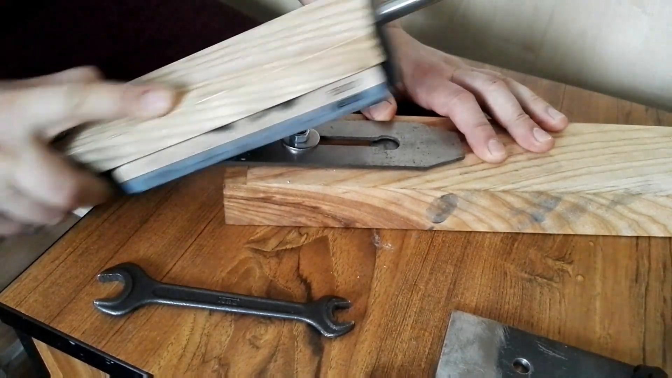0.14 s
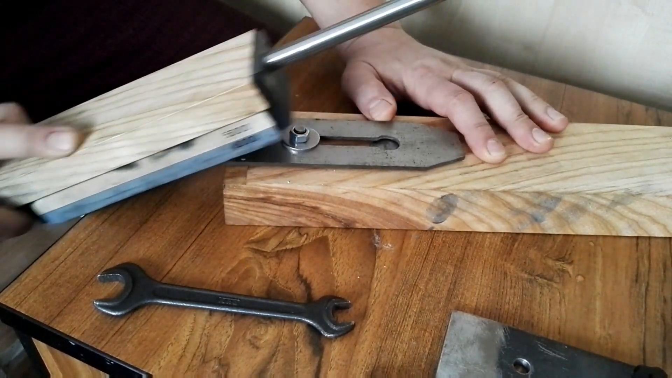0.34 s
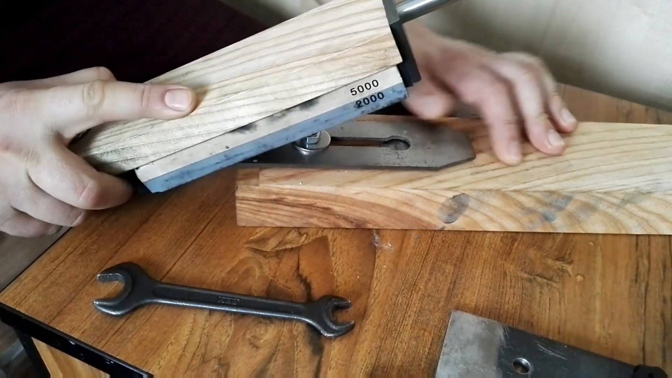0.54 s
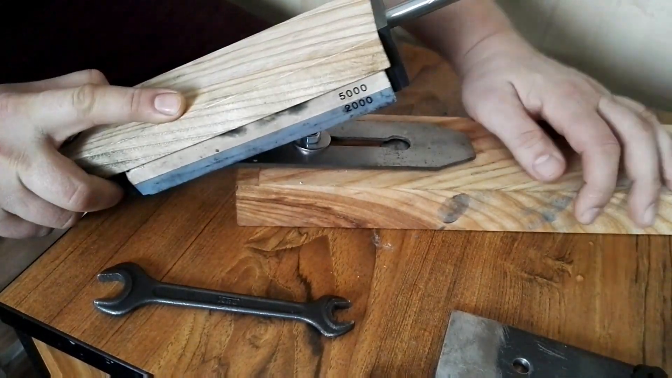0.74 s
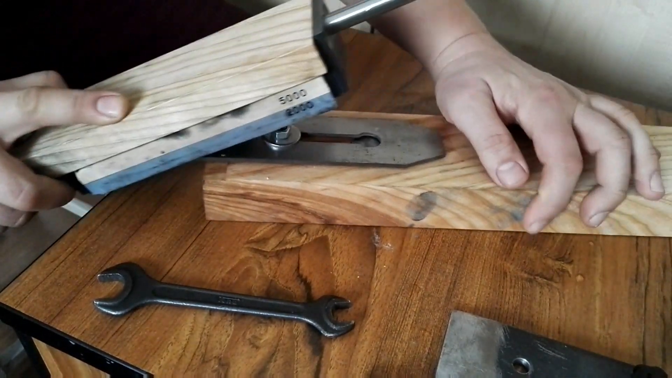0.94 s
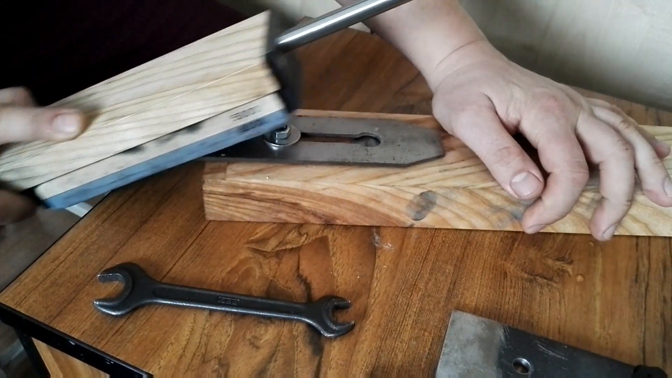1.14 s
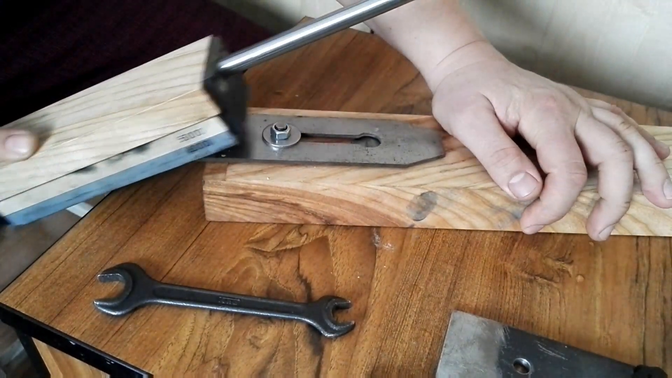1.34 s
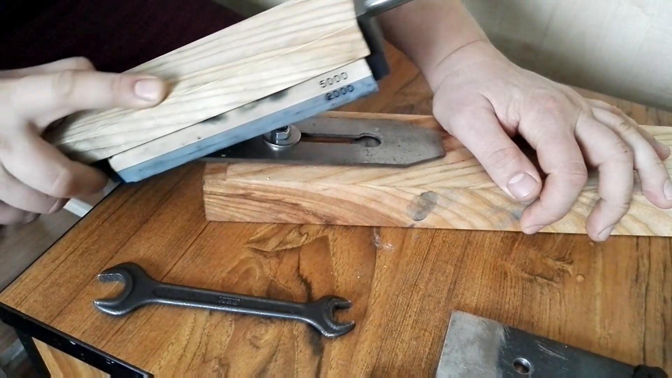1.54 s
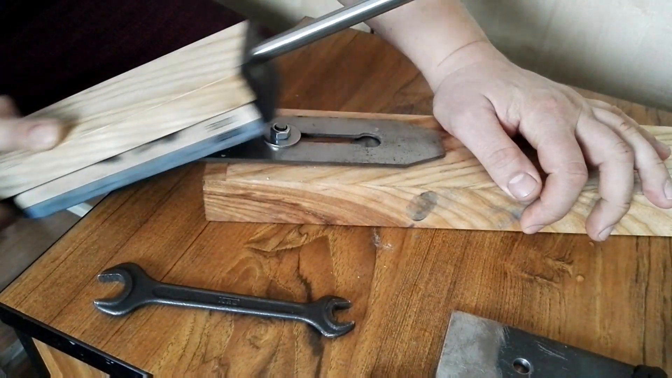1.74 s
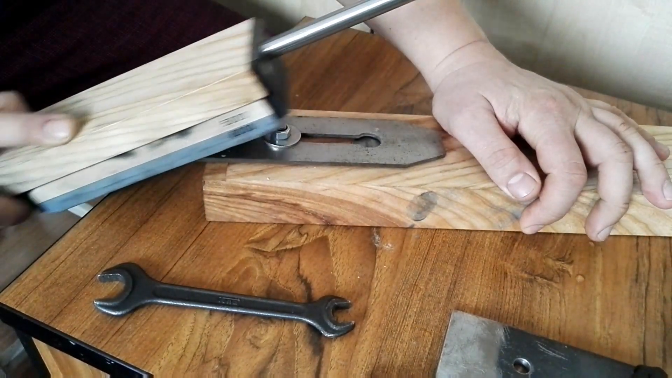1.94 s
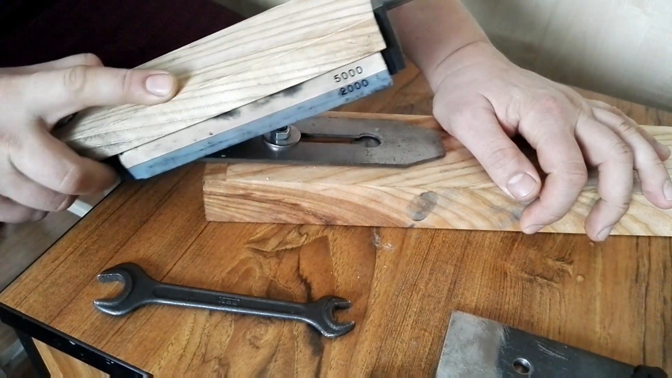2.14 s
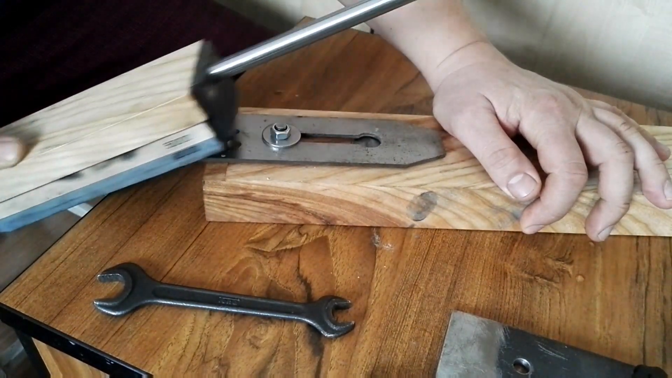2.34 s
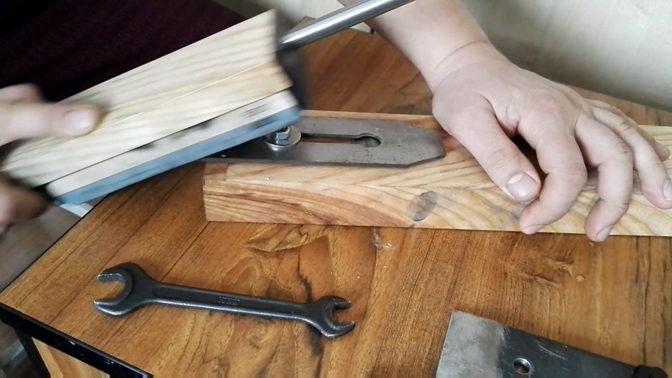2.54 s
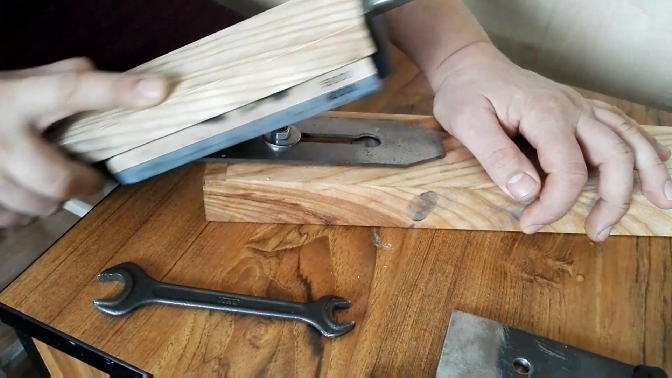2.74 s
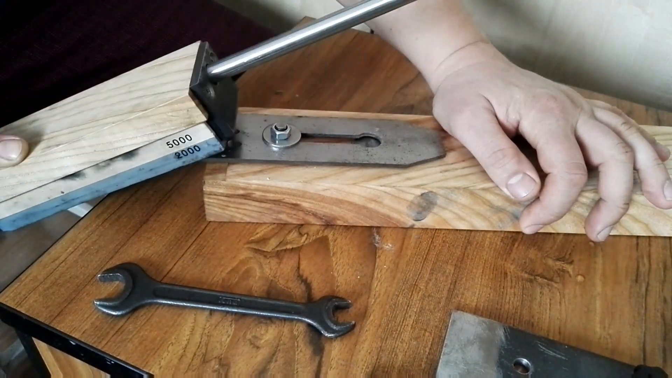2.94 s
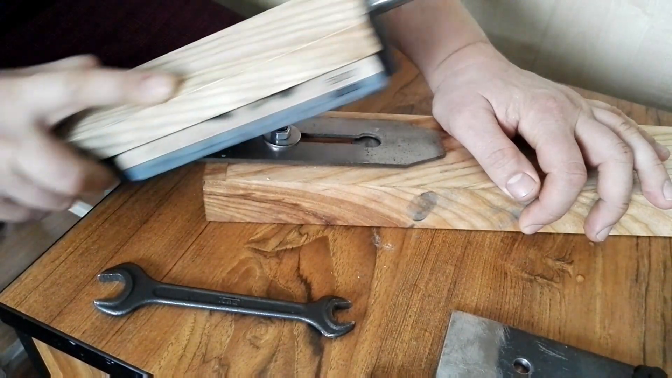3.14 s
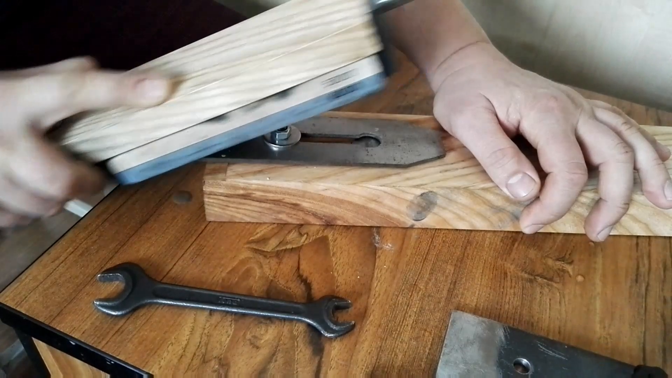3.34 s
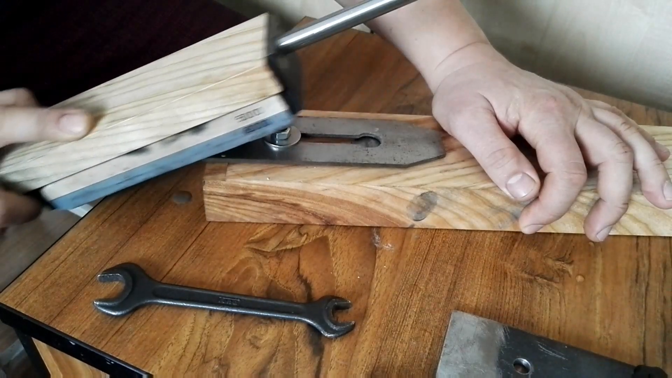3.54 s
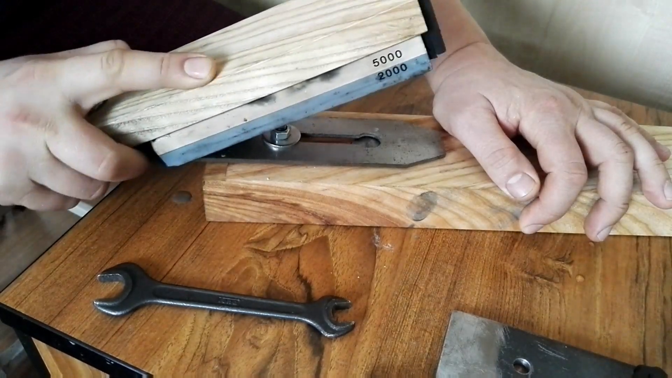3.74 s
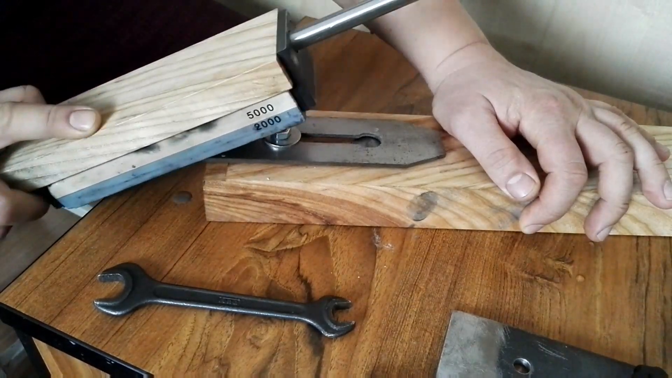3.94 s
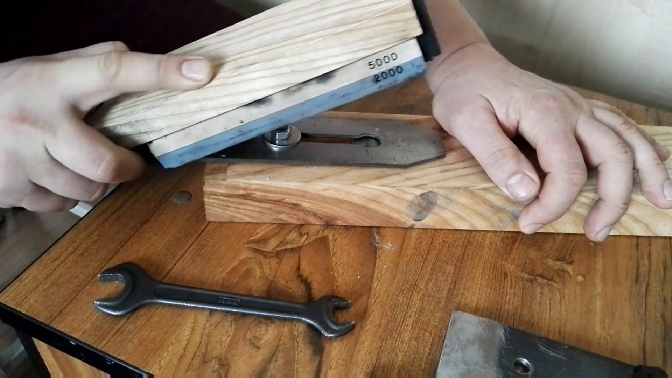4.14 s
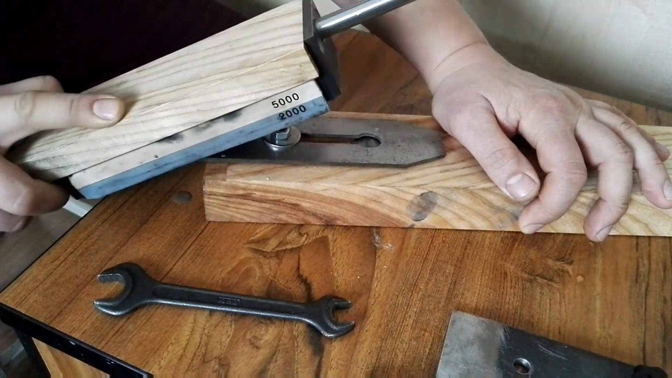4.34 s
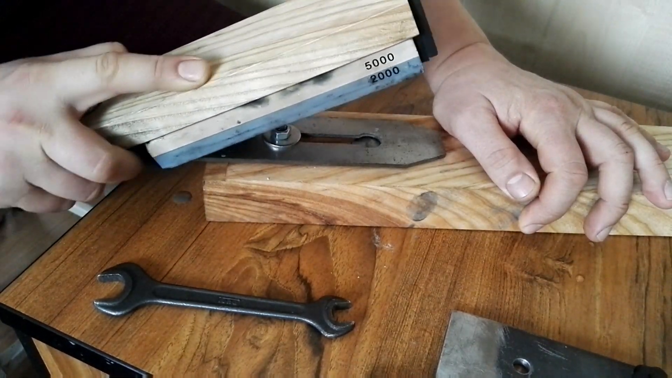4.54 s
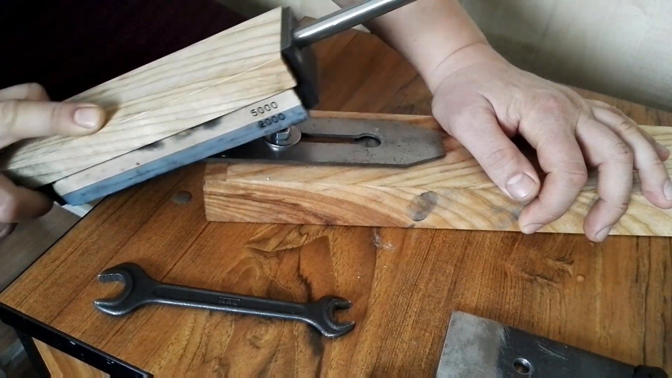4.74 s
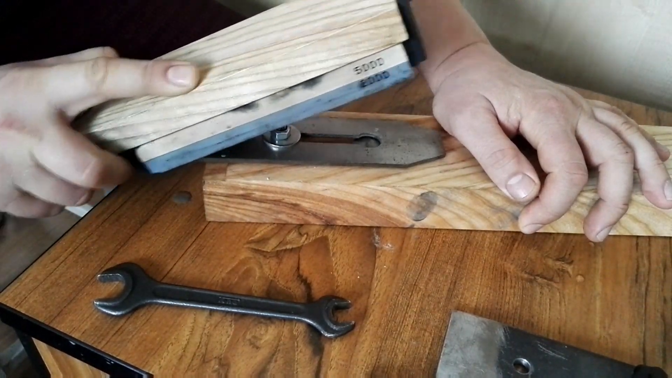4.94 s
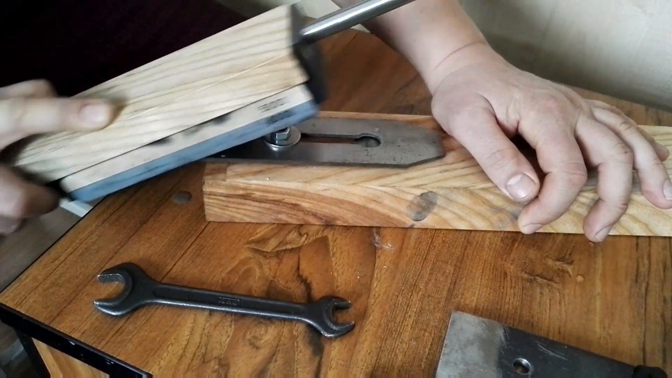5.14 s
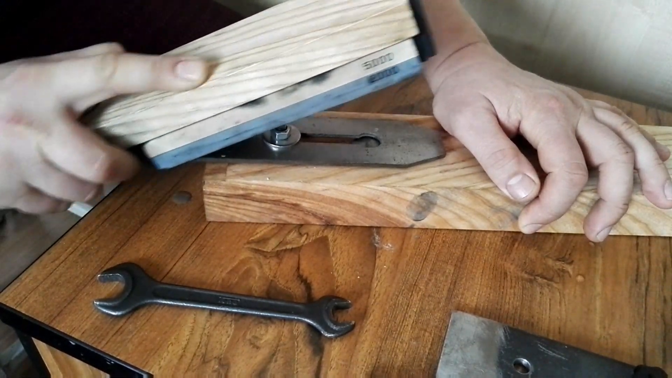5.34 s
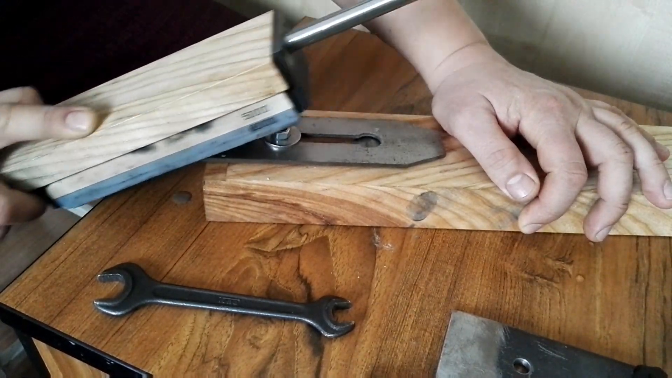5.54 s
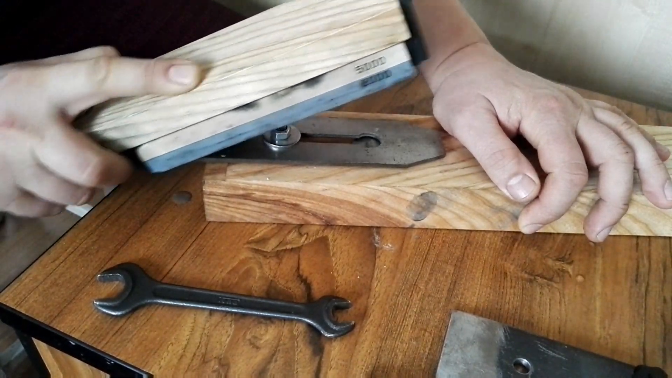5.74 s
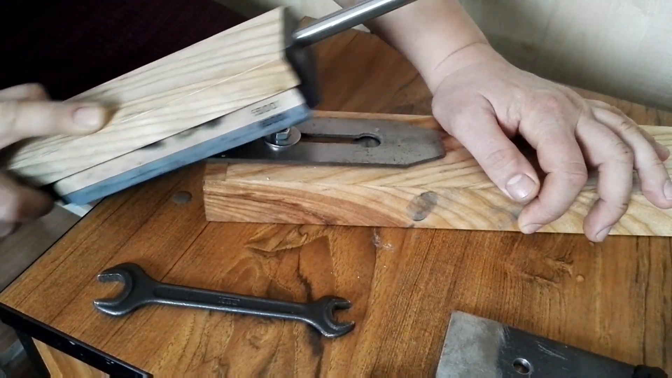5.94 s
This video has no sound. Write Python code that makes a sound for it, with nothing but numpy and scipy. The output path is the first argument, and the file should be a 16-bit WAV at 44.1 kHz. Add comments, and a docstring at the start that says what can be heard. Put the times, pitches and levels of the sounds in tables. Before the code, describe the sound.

Close, gritty hissing strokes of a sharpening stone rubbed to and fro over steel, with soft wooden knocks and one early pause.

```python
"""First a hissing stroke already under way, with soft knocks of the jig: a waterstone on a guide rod is
rubbed to and fro over a plane iron bolted to a plank on a workshop table, close to a two-port microphone.
Filtered noise makes the hiss of iron and stone and the rumble of wood; damped tones make the knocks and groans.
Near the start the worker pauses and slides the steadying hand along the plank. Quiet room air lies behind."""
import sys
import numpy as np
from scipy import signal
from scipy.fft import rfft, irfft, next_fast_len
from scipy.io import wavfile
from scipy.ndimage import uniform_filter1d, map_coordinates

SR = 44100
rng = np.random.default_rng(int(sys.argv[2]) if len(sys.argv) > 2 else 0)


def int16_out(signal):
    """Quantize to a 16-bit WAV file."""
    q = np.round(np.clip(np.atleast_2d(signal).T, -1, 1) * 32767)
    wavfile.write(sys.argv[1], SR, q.astype(np.int16))


N = 263718


def amp(db):
    """Decibels to gain."""
    return 10 ** (np.asarray(db) / 20)


def unit(x):
    """Scaled to rms 1."""
    return x / np.sqrt(np.mean(x ** 2) + 1e-20)


def along(points, hz, axis=1):
    """One column of a frequency table, read on a log axis."""
    table = np.transpose(points)
    return np.interp(np.log(hz + 1), np.log(table[0]), table[axis])


def clock():
    """The time of each sample in seconds."""
    return np.arange(N) / SR


def wobble(rate):
    """A smooth random curve, rate knots a second."""
    knots = rng.standard_normal(int(N * rate / SR) + 4)
    return map_coordinates(knots, [clock() * rate])


def swell(s, half):
    """A bell-shaped gain that peaks at time s; half is its standard deviation in seconds."""
    return np.exp(-.5 * ((clock() - s) / half) ** 2)


def filtered(x, response):
    """x times a response of frequency."""
    m = next_fast_len(N + SR // 4)
    spectrum = rfft(x, m) * response(np.fft.rfftfreq(m, 1 / SR))
    return irfft(spectrum, m)[..., :N]


def above(hz, edge_hz, order=8):
    """High-pass gain."""
    return 1 / np.sqrt(1 + (edge_hz / (hz + 1)) ** (2 * order))


def below(hz, edge_hz, order=8):
    """Low-pass gain."""
    return 1 / np.sqrt(1 + (hz / edge_hz) ** (2 * order))


def mode(hz, centre, width):
    """One resonance, squared for steep skirts; width is that of the unsquared resonance."""
    return (1j * hz * width / (centre ** 2 - hz ** 2 + 1j * hz * width)) ** 2


# The two microphone ports: (f/Hz, likeness/0-1, phase by which left leads/rad)
MIC_PORTS = [(104, 0.99, 0), (340, 0.95, -0.2), (640, 0.88, 0.69), (1370, 0.81, 2.5), (1414, 0.63, 1),
             (1875, 0.3, 1), (2490, 0.68, 1), (2990, 0.15, 1.3), (3900, 0.2, 1), (4740, 0.6, 1),
             (5830, 0.32, 3), (12030, 0.15, 4), (14360, 0, -19)]


def rush(response, patchy_db):
    """Coloured noise of rms 1 at both ports, with short patches of random gain."""
    z = signal.stft(rng.standard_normal((2, N)), nperseg=512)[2]
    field = uniform_filter1d(rng.standard_normal(z.shape[1:]), size=5, axis=0)
    field = uniform_filter1d(field, size=9, axis=1)
    shared, opposed = signal.istft(z * amp(patchy_db * unit(field)), nperseg=512)[1][:, :N]
    sides = np.array([[1], [-1]])

    def spread(hz):
        return np.arccos(np.clip(along(MIC_PORTS, hz), 0, 1)) / 2

    def heard(hz):
        return response(hz) * np.exp(.5j * sides * along(MIC_PORTS, hz, axis=2))

    middle = filtered(shared, lambda hz: np.cos(spread(hz)))
    side = filtered(opposed, lambda hz: np.sin(spread(hz)))
    return unit(filtered(middle + sides * side, heard))


# Colour of the workshop's still air: (f/Hz, relative level/dB)
ROOM_AIR = [(20, -2), (45, -11.5), (100, 0), (300, -6), (1000, -39), (5000, -51), (15000, -42)]


def room():
    """Steady noise with the colour of the workshop's still air."""
    return amp(-75) * rush(lambda hz: amp(along(ROOM_AIR, hz)), patchy_db=.5)


def walls(x, echo_db, count=12):
    """Table top and near walls send weak early echoes, different at each port, that ripple the treble."""
    delays_s = rng.uniform(0.001005, .016, (count, 2, 1))
    signs = rng.choice([-1, 1], (count, 2, 1))

    def echoes(hz):
        total = sum(g * np.exp(-2j * np.pi * hz * d) for g, d in zip(signs, delays_s))
        return amp(echo_db) * above(hz, 1370, order=2) * total / np.sqrt(count)

    return filtered(x, echoes)


# Colour of skin rubbing on wood: (f/Hz, relative level/dB)
SKIN_COLOUR = [(60, -45), (170, -8), (255, 8.5), (320, 1), (400, -4), (520, -32), (900, -40)]
# The table shifts with a dull bump: (t/s, spread/s, level/dB)
TABLE_SHIFTS = [(3.723, 0.042, -69), (4.382, 0.042, -61)]
SKID = (.927, .011, -49)  # the skin skids once: (t/s, spread/s, level/dB)
# The hand slides along the plank, pressing ever harder, then eases off and comes to rest
SLIDE_PEAK_S, SLIDE_END_S, SLIDE_STOP_S, SLIDE_DB = .95, 1.045, .006, -41
SLIDE_RISE_DB_PER_S, SLIDE_FALL_DB_PER_S = 155, 133
RASP_DB = -15  # the dry rasp, relative to the dull rubbing


def handling():
    """The hand judders along the plank as dull noise and a dry rasp; now and then the table shifts."""
    judder_db = 2.0 * wobble(100)
    since = clock() - SLIDE_PEAK_S
    moving = .5 - .5 * np.tanh((clock() - SLIDE_END_S) / SLIDE_STOP_S)
    press_db = np.minimum(SLIDE_RISE_DB_PER_S * since, -SLIDE_FALL_DB_PER_S * since)
    slide = moving * amp(SLIDE_DB + press_db + judder_db)
    rubbing = slide * rush(lambda hz: amp(along(SKIN_COLOUR, hz)), patchy_db=1)

    def dry_skin(hz):
        return above(hz, 400, order=3) * below(hz, 1150, order=10) * below(hz, 900, order=1)

    skin = rush(dry_skin, patchy_db=2)
    # the whole plank radiates, so both ports hear much the same
    skin = unit(skin[0] + .5 * skin[::-1])
    skid_s, skid_half, skid_db = SKID
    skid = amp(skid_db + judder_db) * swell(skid_s, skid_half)
    rasp = (amp(RASP_DB) * slide + skid) * skin
    thud = rush(lambda hz: above(hz, 30, order=2) * below(hz, 130, order=2), patchy_db=1)
    bumps = thud * sum(amp(db) * swell(s, half) for s, half, db in TABLE_SHIFTS)
    return rubbing + rasp + bumps


# Modes of plank and table: (f/Hz, width/Hz, relative level/dB)
WOOD_MODES = [(175.6, 13.5, -1.5), (272, 43, 2), (329, 30.2, 1.5), (449.2, 12.6, 0.5), (544, 49, -10),
              (714, 35, -9.5)]


def wood(hz):
    """Causal response of plank and table: resonances summed with alternating sign."""
    total = 0
    for k, (centre, width, db) in enumerate(WOOD_MODES):
        resonance = 1j * hz * width / (centre * centre - hz * hz + 1j * hz * width)
        total = total + (-1) ** k * amp(db) * resonance
    return total


# The jig jolts in mid-stroke and rocks as the stone is eased off: (t/s, relative level/dB)
JIG_JOLTS = [(0.045, -33), (0.569, -33.5), (0.609, -44), (0.625, -45), (1.097, -37), (1.734, -32),
             (4.108, -34)]
KNOCK_LEAD_S = {"pull": 0.0118, "push": 0.02053}  # the jig takes up its play this long before the row ends


def knocks():
    """Soft, damped blows of the jig: a few cycles of the plank, then the table's faint ring."""
    t = np.arange(SR // 10) / SR
    blows = np.zeros(N + SR)
    hits = list(JIG_JOLTS)
    for (_, direction, *_, db), end in zip(STROKE_PARTS, bounds()[1:]):
        hits.append((end - KNOCK_LEAD_S[direction], db))
    rise = (t / 0.0017) ** 2
    envelope = rise / (1 + rise) * np.exp(-(t / 0.017) ** 2)
    for (s, db), chance in zip(hits, rng.standard_normal((len(hits), 1))):
        pitch_hz = 272 * (1 + 0.043 * chance)
        blows[round(s * SR):][:len(t)] += amp(db) * envelope * np.sin(2 * np.pi * pitch_hz * t)
    blows = blows[:N]
    return amp(-6.0) * blows + amp(-13.5) * filtered(blows, wood)


GROAN_FULL_DB = -44.5  # rows with a hiss this firm or firmer groan in full


def groan():
    """As each stroke or part begins, the slow stone sticks and slips; the table answers with a short low note."""
    starting = sum(amp(min(db, GROAN_FULL_DB)) * swell(s, 0.017) for s, _, db, *_ in STROKE_PARTS)
    pitch_hz = 122 * (1 + 0.064 * wobble(40))
    note = np.sin(2 * np.pi * np.cumsum(pitch_hz) / SR)
    return starting * amp(-18.5 + 0.85 * wobble(12)) * note


# Grit on steel: (f/Hz, left relative level/dB, right relative level/dB)
GRIT_COLOUR = [(780, -14, -15), (990, -7.5, -11), (2200, -6.5, -10), (2850, -8, -10.5), (3450, -1, -3),
               (3850, -4, -6), (6600, -2, -4), (8100, -3.5, -9.5), (9160, -10, -7.5), (9370, -1.5, -9),
               (10100, -8.5, -11), (12700, -4.5, -12.5), (13650, -2, -13), (16700, -12.5, -10.5)]
# Resonances of iron, stone and holder: (f/Hz, width/Hz, left lift/dB, right lift/dB)
IRON_RINGS = [(1037, 25, 4, 0), (1114, 75, 8, 4), (1259, 75, 3, 0), (1396, 163, 7, 8), (1627, 118, 8, 7),
              (1904, 75, 6, 0), (2008, 78, 9, 5), (2139, 55, 6, 3), (2620, 300, 2, 7), (3662, 122, 0, 3),
              (4728, 21, 7, 2), (4898, 342, 6, 0), (5242, 235, 4, 3), (10054, 489, 3, 8),
              (15146, 300, 7, 0)]


def steel(hz):
    """Left and right gain of the friction noise, lifted at each resonance."""
    db = np.array([along(GRIT_COLOUR, hz), along(GRIT_COLOUR, hz, axis=2)])
    for centre, width, left_db, right_db in IRON_RINGS:
        db = db + np.outer([left_db, right_db], 1 / (1 + (2 * (hz - centre) / width) ** 2))
    return amp(db)


# A rough spot on the stone crosses the edge in every row; a push meets it where the pull did, in reverse.
# Its place drifts as the worker shifts to another stretch of the stone: (t/s, place/share of a pull)
ROUGH_SPOT = [(0.25, 0.43), (1.2, 0.41), (1.6, 0.33), (2.6, 0.35), (2.9, 0.37), (3.45, .58), (4.5, 0.63),
              (5.5, 0.59), (5.9, 0.5)]
SECOND_SPOT = .41  # a second one lies this share of a stroke further on
SECOND_SPOT_DB = {"pull": 0, "push": -1}  # relative to the first


def catches():
    """When and how hard the rough spots cross the edge, as (s, dB); a slow stone hardly catches."""
    found = []
    for (start, direction, *_, catch_db, _), length in zip(STROKE_PARTS, np.diff(bounds())):
        spot = np.interp(start + length / 2, *np.transpose(ROUGH_SPOT))
        for place, extra_db in (spot, 0), (spot + SECOND_SPOT, SECOND_SPOT_DB[direction]):
            way = place if direction == "pull" else 1 - place
            if 0 < way < 1:
                speed_db = 20 * np.log10(np.sin(np.pi * way))
                found.append((start + way * length, catch_db + extra_db + speed_db))
    return found


# The holder's chattering mode and the plank's longest-ringing mode: (f/Hz, width/Hz)
HOLDER, PLANK = (1610, 150), (450, 26)
CATCH_S = 0.016  # spread of a catch
PLANK_LAG_S, PLANK_S, PLANK_DB = 0.032, 0.038, -3  # lag, spread and relative drive of the plank's answer


def chatter():
    """Where the stone catches, the holder sings and shakes the wood; the plank rings on a little longer."""
    grip = sum(amp(db) * swell(s, CATCH_S) for s, db in catches())
    after = sum(amp(db + PLANK_DB) * swell(s + PLANK_LAG_S, PLANK_S) for s, db in catches())
    holder = rush(lambda hz: mode(hz, *HOLDER), patchy_db=1)
    scrape = rush(lambda hz: steel(hz) * above(hz, 1200) * below(hz, 2300, order=2), patchy_db=1.5)
    shake = rush(lambda hz: mode(hz, 310, 80) + .3 * mode(hz, 600, 200), patchy_db=1)
    plank = rush(lambda hz: mode(hz, *PLANK), patchy_db=1)
    caught = amp(-0.5) * holder + amp(2.5) * scrape + amp(-5) * shake
    return grip * caught + after * amp(-3.5) * plank


LAST_END_S = 6.0


def bounds():
    """The times in seconds at which strokes and pauses begin, and the last one ends."""
    return np.array([row[0] for row in STROKE_PARTS] + [LAST_END_S])


def motion():
    """Rows played so far (a running count), the stone's speed 0-1, and the hand's weight, which builds later."""
    travel = np.interp(clock(), bounds(), np.arange(len(STROKE_PARTS) + 1))
    way = travel % 1
    return travel, np.sin(np.pi * way), np.abs(np.sin(np.pi * way ** 1.63))


RAMP_SHARE = 0.67  # the middle share of a row over which its level ramps


def pressure(travel, level_db, rise_db):
    """Each row's level ramps evenly through its middle and eases over into the next."""
    ends = np.array([-.5, .5])
    places = np.arange(len(STROKE_PARTS))[:, None] + .5 + ends * RAMP_SHARE
    levels = level_db[:, None] + np.outer(rise_db, ends)
    return np.interp(travel, places.ravel(), levels.ravel())


# A keen patch of the stone hisses louder as it crosses the edge: (t/s, place/share of a pull)
KEEN_PATCH = [(2.95, 0.783), (3.3, 0.34)]
KEEN_DB, KEEN_WIDTH = 1, 0.075  # lift before the bite scales it; spread as a share of a stroke


def keenness(travel):
    """The lift in dB while the keen patch is on the edge."""
    row = np.minimum(travel.astype(int), len(STROKE_PARTS) - 1)
    pulling = np.array([part[1] == "pull" for part in STROKE_PARTS])[row]
    place = np.where(pulling, travel % 1, 1 - travel % 1)
    patch = np.interp(clock(), *np.transpose(KEEN_PATCH))
    return KEEN_DB * np.exp(-.5 * ((place - patch) / KEEN_WIDTH) ** 2)


# One row per stroke or part of one, such as a lift or rest; the levels steer layers that add their own trims:
# (start t/s, direction, hiss level/dB, rise of the hiss along the row/dB,
# hiss left at the start level/dB, catch on the rough spot level/dB, closing knock level/dB)
STROKE_PARTS = [(-0.115, "push", -40, -4, -71, -79, -35), (0.144, "pull", -38.3, 5.5, -64, -49, -38),
                (0.376, "push", -42, -5, -52.5, -53.5, -34), (0.611, "push", -59.5, 1, -75.5, -80, -60),
                (0.672, "push", -64, 3, -75, -87, -52), (0.736, "push", -49, 0, -60.5, -79, -58),
                (0.941, "push", -49.5, 0.5, -59.5, -59.5, -62), (1.052, "push", -73.5, -6, -68, -93, -56),
                (1.082, "pull", -39.5, 7, -76, -53.5, -42), (1.355, "push", -42.5, -0.5, -59, -51.5, -45),
                (1.64, "pull", -41.5, 1.5, -60.5, -50.5, -37), (1.903, "push", -43, 0.5, -59.5, -52, -38.5),
                (2.193, "pull", -41.5, 5.5, -61, -48.5, -45), (2.465, "push", -42.5, -2, -57.5, -48.5, -34),
                (2.764, "pull", -42, 1.5, -59, -49.5, -33),
                (3.011, "push", -43.5, -1.5, -57.5, -46.5, -37.5), (3.32, "pull", -44, 4.5, -70, -47, -38),
                (3.553, "push", -42.5, -1.5, -55.5, -50.5, -36), (3.807, "pull", -44, 1.5, -65, -50, -47),
                (4.017, "push", -43.5, 0.5, -56, -56, -33.5), (4.25, "pull", -45, 2, -70.5, -54.5, -33),
                (4.424, "push", -45, 3, -59, -53.5, -32.5), (4.62, "pull", -45, 2.5, -68, -50, -37.5),
                (4.81, "push", -44.5, 0, -55.5, -55, -35), (5.001, "pull", -43.5, 0, -59, -50, -39),
                (5.174, "push", -43, 1.5, -53.5, -49, -31.5), (5.378, "pull", -43, 0, -61.5, -50, -36),
                (5.578, "push", -44, 0.5, -57.5, -52.5, -34.5), (5.781, "pull", -44, -2, -57, -50.5, -48)]
# Coarse grinding by direction, relative to the hiss: (level/dB, rise along the row/dB);
# a pull starts light and digs in late
COARSE_GRIND = {"pull": (-10.5, 1.8), "push": (-5.5, -1)}
# The shaken wood by direction, relative to the hiss: (level/dB, rise along the row/dB)
WOOD_RUMBLE = {"pull": (-11, 0.67), "push": (-9, -3.5)}
WOOD_FULL_DB = -43  # rows with a firmer hiss than this shake the wood no harder
RING_DB = {"pull": -9, "push": -11.5}  # the iron's ring, relative to the hiss


def honing():
    """Countless grit contacts merge into noise that swells with speed and pressure and stalls between rows."""
    _, directions, level_db, rise_db, start_db, _, _ = map(np.array, zip(*STROKE_PARTS))
    coarse_db, dig_db = np.transpose([COARSE_GRIND[d] for d in directions])
    wood_db, shake_db = np.transpose([WOOD_RUMBLE[d] for d in directions])
    ring_db = np.array([RING_DB[d] for d in directions])
    travel, speed, weight = motion()
    stall_db = np.interp(travel, np.arange(len(start_db)), start_db)
    bite = np.tanh((speed / 0.38) ** 1.31)  # friction noise saturates once the stone is under way
    tremor_db = .65 * wobble(35) + .55 * wobble(150)  # the hand's pressure is never quite even
    moving_db = pressure(travel, level_db, rise_db) + keenness(travel)
    hiss_db = stall_db + bite * (moving_db - stall_db) + tremor_db

    def iron(hz):  # the cluster of the iron's own modes
        return above(hz, 5140, order=24) * below(hz, 5030, order=24)

    def hiss_colour(hz):
        return steel(hz) * above(hz, 2090) * below(hz, 8180) * (1 - iron(hz))

    hiss = amp(hiss_db - 3.0 + 0.68 * wobble(25)) * rush(hiss_colour, patchy_db=2.5)
    ring_level = amp(hiss_db + pressure(travel, ring_db, 0))
    ring = ring_level * rush(lambda hz: steel(hz) * iron(hz), patchy_db=3.6)
    # the finest fizz needs speed, so every row begins and ends duller
    fizz_level = amp(hiss_db - 4 - 5.7 * (1 - bite) + 0.21 * wobble(20))
    fizz = fizz_level * rush(lambda hz: steel(hz) * above(hz, 8980), patchy_db=2.5)

    # the stone's body is shaken hardest in the fast middle of the row, its lowest modes only under weight
    rest_db = stall_db - 2.5
    drive = np.tanh((speed / .45) ** .8)
    digging_db = pressure(travel, level_db + coarse_db, rise_db + dig_db)
    grind_db = rest_db + drive * (digging_db - rest_db) + tremor_db
    grind_level = amp(grind_db - 2.27 + 1.8 * wobble(120))
    grind = grind_level * rush(lambda hz: steel(hz) * above(hz, 1270) * below(hz, 2940), patchy_db=2.3)
    slack_db = 7 * (1 - weight)
    growl_level = amp(grind_db - 4.0 - slack_db)
    growl = growl_level * rush(lambda hz: steel(hz) * above(hz, 800, order=4) * below(hz, 1270), patchy_db=2.0)

    shaken_db = pressure(travel, np.minimum(level_db, WOOD_FULL_DB) + wood_db, shake_db) - slack_db
    # a lifted stone cannot shake the wood
    rumble_db = np.minimum(shaken_db, hiss_db + 6.0) + 1.8 * wobble(40)
    rumble = amp(rumble_db + 1.0) * rush(lambda hz: wood(hz) * above(hz, 143, order=3), patchy_db=-0.07)
    return hiss + ring + fizz + grind + growl + rumble


def scene():
    """The work at the bench, close by, over a quiet room."""
    work = handling() + knocks() + groan() + chatter() + honing()
    return room() + walls(work, echo_db=-9.5) + work


TOP_HZ = 15600


def record(dry):
    """The microphone's band limit: nothing passes above it."""
    return filtered(dry, lambda hz: hz < TOP_HZ)


dry = scene()
out = record(dry)
int16_out(out)
```